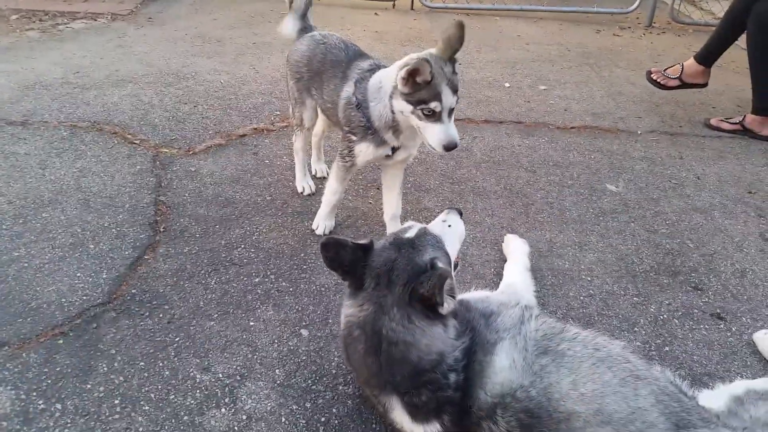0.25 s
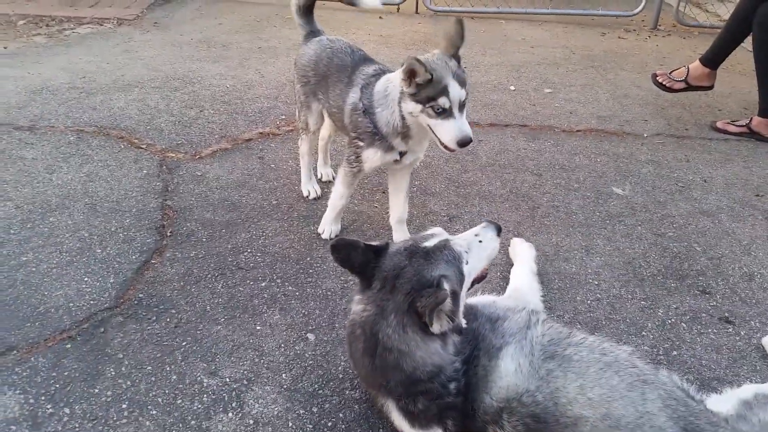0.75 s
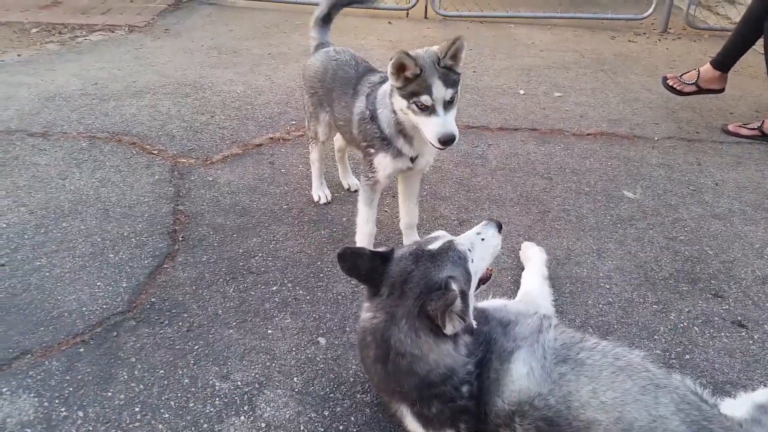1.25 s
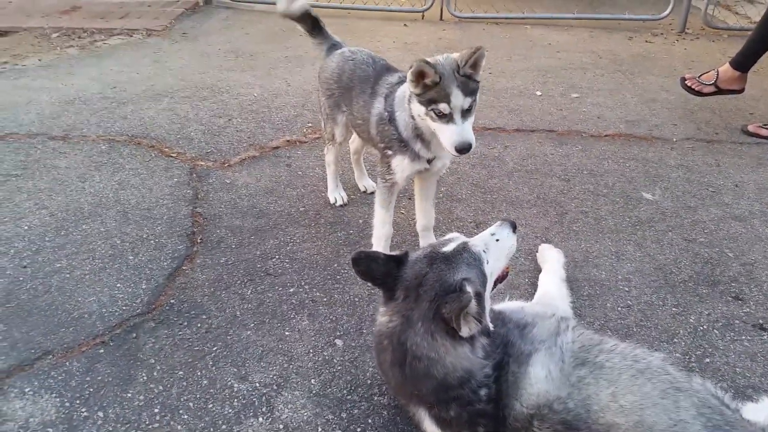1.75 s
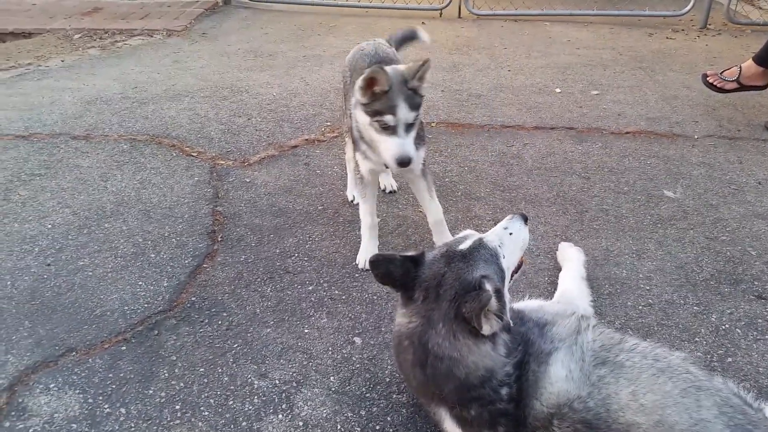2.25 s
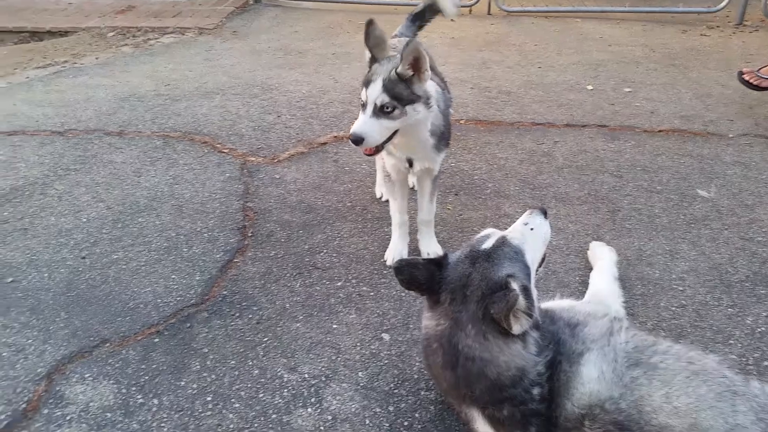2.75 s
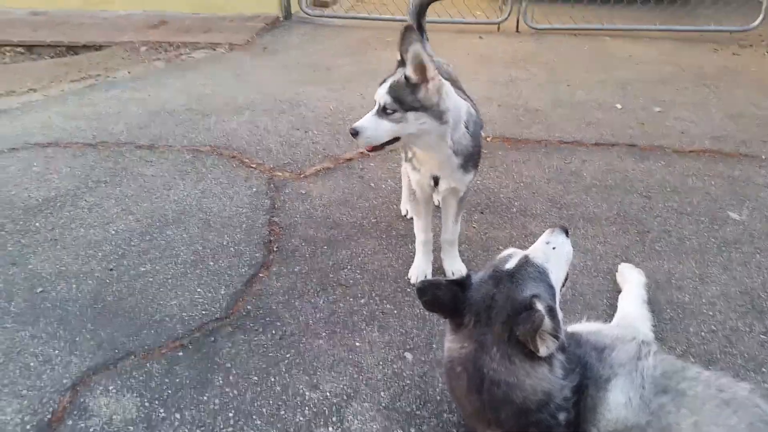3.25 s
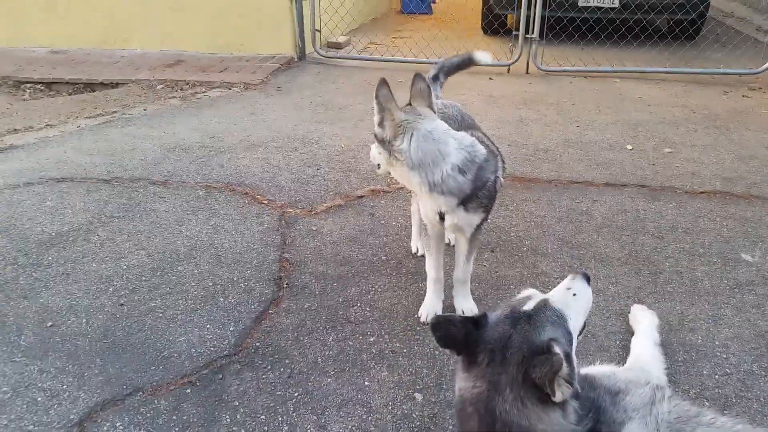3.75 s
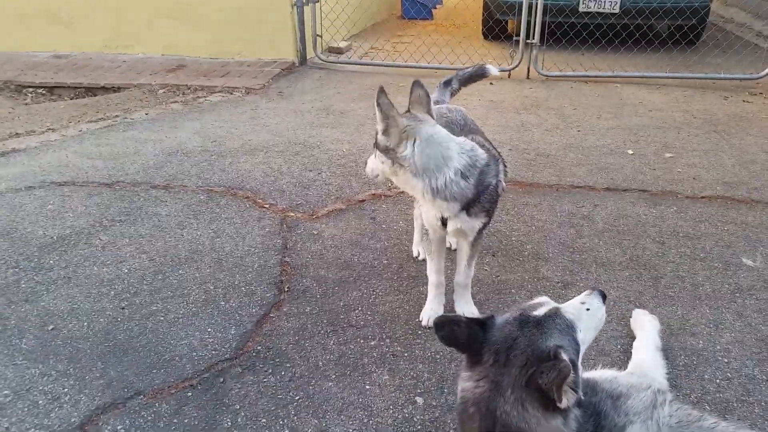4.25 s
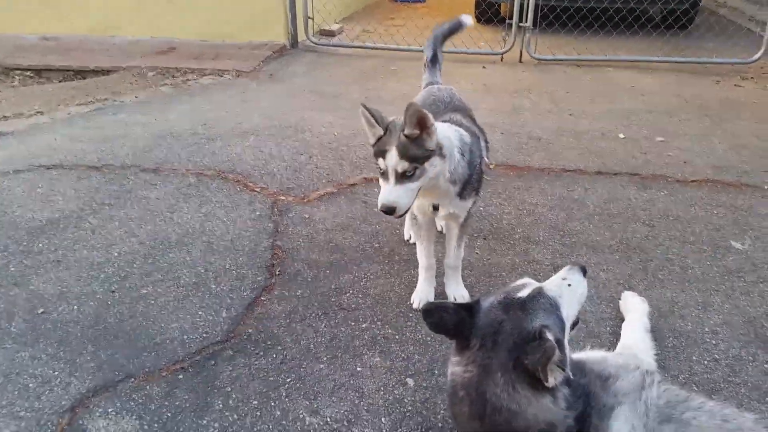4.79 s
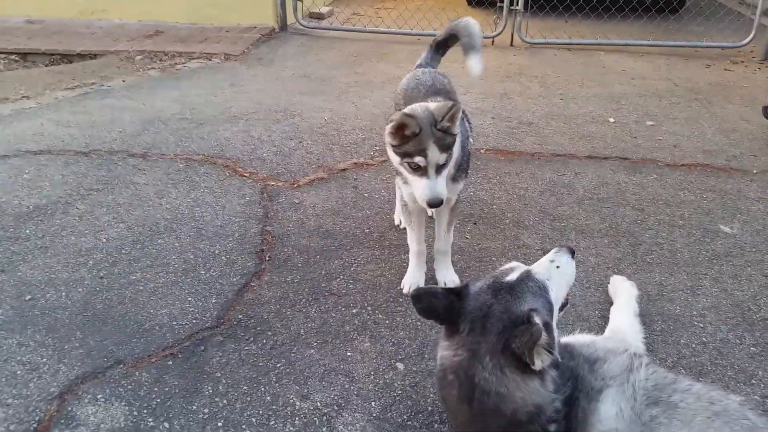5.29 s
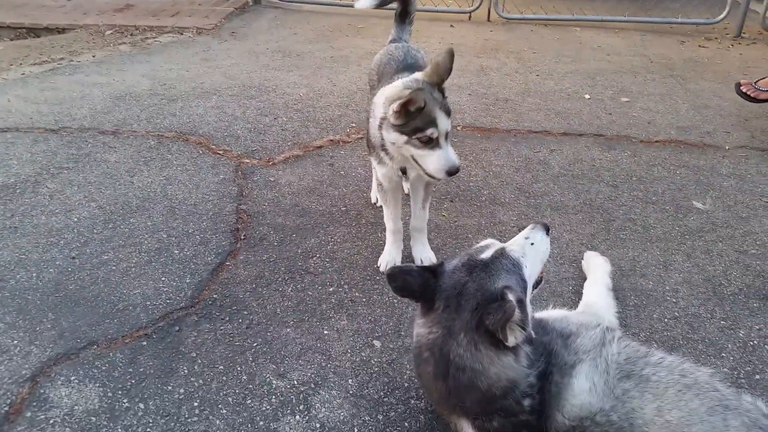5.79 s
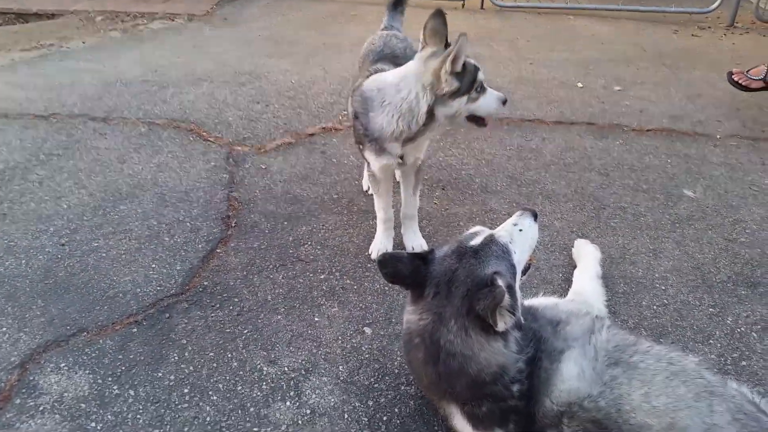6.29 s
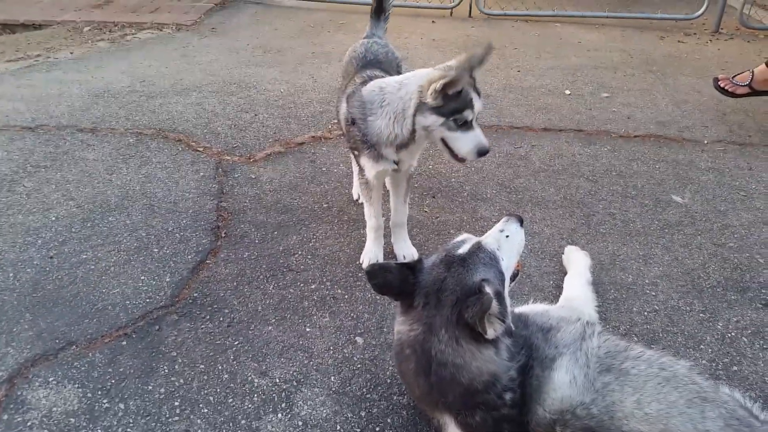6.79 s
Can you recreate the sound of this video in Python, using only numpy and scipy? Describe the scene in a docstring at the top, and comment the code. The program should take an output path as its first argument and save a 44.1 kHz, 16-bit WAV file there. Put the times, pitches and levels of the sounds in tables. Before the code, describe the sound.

A close stereo phone pickup on a paved yard. Throughout, a dull low roar, a wavering hum near 120 Hz and faint hiss, stronger on the left. From 0 to 0.9 seconds, soft brief pants, bright dry collar-tag clinks and claw clicks, the sharpest pair at 0.6, with light fur brushing. At about 1.0 a loud, abrupt, rough-voiced puppy yip lasts under a tenth of a second, ending in a breathy puff and short wall reflection. More tag clinks follow around 1.3. A second, similar yip comes at 1.93, with a tag clink just after. The background is pressed down after the yips and gradually swells back from about three seconds. A very thin, high nose whistle glides near 3.2; claws tick faintly at 3.8 and 6.4. Muffled low hand bumps occur now and then, clustering from 6.2 to 6.8.

```python
"""A puppy yips twice on a paved yard, close to a phone: harmonic voice through three resonances, plus breath.
Nose pants and whistles; collar tag (ringing partials), claws (snaps and ticks), fur (shaped noise).
The hand bumps the phone with decaying low pushes; walls answer by convolution with a noise tail.
Behind: a wavering machine hum, a dull yard roar and hiss, all shaped noise but the hum.
The phone limits the yips, then holds its gain down for about a second."""
import sys
import numpy as np
from scipy import signal
from scipy.fft import rfft, irfft, next_fast_len
from scipy.io import wavfile
from scipy.ndimage import uniform_filter1d, map_coordinates

SR = 44100
rng = np.random.default_rng(int(sys.argv[2]) if len(sys.argv) > 2 else 0)


def wav_out(sig):
    """Save sig, one row per channel (or a flat mono array), as 16-bit PCM at SR to the path in sys.argv[1]."""
    wavfile.write(sys.argv[1], SR, np.round(np.clip(np.atleast_2d(sig).T, -1, 1) * 32767).astype(np.int16))


N = 310023

# Levels are those ahead of the phone's gain control.
# Voice, one track per yip: (time [s], slow fold rate [Hz], level [dB], odd partials [dB],
# mouth resonance [dB], jaw opening [0-1])
YIP_TRACKS = [
    [(.992, 229, -19.5, -8, 1.5, .6), (1.0, 241, 1, -18.5, 7, .95), (1.007, 262.6, 0.5, -15, 9.5, 1),
     (1.013, 291.2, 1, -3.5, -3.5, 0.9), (1.02, 297, -3.5, 9, -13.5, 0.88), (1.03, 315, 5, -2.5, -9.5, 1),
     (1.043, 315, -2, -14, 3, .5), (1.05, 360, 10.5, -14, 0, .35), (1.058, 347, -1.5, -9.5, 6.5, .1),
     (1.066, 333, -2, -2.5, -1.5, .05)],
    [(1.928, 247.2, -12, 2.5, -6, 0.6), (1.935, 256.7, 3, 6, -8, .35), (1.944, 271.5, 13.5, 12, -9.5, .2),
     (1.955, 315, 2.5, 5.5, -11, 1), (1.965, 332, 2.5, -5.5, -1.5, .9), (1.975, 310, 6.5, 3, -12.5, 1),
     (1.99, 312, 0, -28.5, 3, 0.4), (2.004, 315, -4.5, 1, -11, .05)],
]
# Snout colour on the partials: (frequency [Hz], level [dB])
SNOUT_TONE = [(200, 3), (330, -11.5), (500, -1.5), (620, -2), (1000, 0), (1600, 3), (2400, 0), (2850, -14),
              (3300, -12), (4500, -32.5), (7000, -57.5)]
# Breath of each yip: (rasp at mid yip [dB], closing puff [dB])
HUFF_LEVELS = [(-34, -37.5), (-29.5, -37.5)]
# Rasp spectrum: (frequency [Hz], level [dB])
RASP_TONE = [(2500, -26.5), (3300, -2.5), (6600, -16), (7700, 1.5), (9000, -9.5), (10400, -1),
             (13000, -19.5), (16000, -10)]
# Closing puff spectrum: (frequency [Hz], level [dB])
PUFF_TONE = [(2500, -29), (3500, -2.5), (4800, -2.5), (6000, -10), (7500, -11), (16000, -19)]
# Pants: (middle [s], length [s], level [dB])
PANT_STROKES = [(.02, 0.042, -52.5), (.28, 0.33, -52), (.96, .06, -52.5), (1.896, 0.025, -45)]
# Thin nose whistles, one track each: (time [s], frequency [Hz], level [dB])
WHISTLE_TRACKS = [
    [(.2, 12500, -84), (.24, 13000, -74), (.265, 13900, -72), (.29, 13600, -84)],
    [(2.97, 10400, -84), (3.06, 12000, -76), (3.115, 12300, -76), (3.16, 13650, -61), (3.2, 13850, -56),
     (3.235, 13600, -58), (3.265, 12300, -84)],
]
# Touches of the collar tag: (time [s], level [dB])
TAG_TOUCHES = [(0.0244, -58), (0.2916, -35), (0.3525, -29), (0.4135, -34), (0.545, -47), (0.5845, -34.5),
               (0.8345, -40.5), (0.8714, -58), (1.1363, -39.5), (1.3159, -31), (1.3294, -33),
               (1.4875, -42.5), (1.5, -46.5), (1.5614, -56), (1.6247, -56), (1.7684, -46.5), (2.0328, -31),
               (2.2912, -44), (2.9657, -83)]
# Partials of the tag: (frequency [Hz], level [dB], t60 [s])
TAG_MODES = [(11580, 5, 0.029), (11390, -12, 0.086), (14890, -40, .03), (7430, -33, 0.049)]
# Claws on paving: (time [s], level [dB], tick and scrape re snap [dB])
CLAW_TICKS = [(0.1156, -45, -2), (0.1554, -44, -10), (0.2664, -36, -8), (0.4544, -32.5, -9),
              (0.6008, -24.5, 4.5), (0.6161, -24, 4.5), (0.7444, -46, -0.5), (1.3748, -47, 7.5),
              (2.0334, -50, -24), (3.8227, -36.5, -1), (3.8844, -46, -27.5), (4.7531, -58, -10),
              (5.7394, -51, -15), (6.3794, -40, -15)]
# Hand on the case: (time [s], level [dB], push frequency [Hz], knock re push [dB])
CASE_BUMPS = [(0.178, -29, 74.4, -18), (0.551, -31, 124, -3.5), (1.062, -15.5, 132, 1),
              (1.571, -26, 90.4, -11), (1.808, -28, 48.4, -22), (1.879, -30, 129, -7),
              (2.399, -29, 81.1, -12), (3.652, -26, 152, -12), (4.994, -33.5, 185, -16),
              (5.113, -35, 120, -10), (6.231, -22.5, 82, -15), (6.551, -21.5, 88, -11),
              (6.618, -29, 69.5, -10), (6.712, -36.5, 120, 6.5), (6.739, -31, 68, -4),
              (6.786, -26.5, 127, -13)]
# Fur and skin brushing: (start [s], length [s], level [dB])
FUR_STROKES = [(0, 1.4, -72), (0.274, 0.12, -67.5), (0.452, 0.028, -67.5), (.6, .03, -65),
               (.65, .04, -58.5), (3.185, 0.099, -73.5), (3.82, 0.065, -70), (6.728, 0.079, -65)]
# Brushing spectrum: (frequency [Hz], density [dB per Hz])
FUR_TONE = [(3820, -34.5), (6500, -7), (8120, -16), (9550, -0.5), (10400, -1), (15000, 1), (16000, -29.5)]
# Yard roar spectrum: (frequency [Hz], density [dB per Hz])
ROAR_TONE = [(12, -46), (20, -24), (49, -6), (88, -10.5), (124, -3), (254, -12.5), (384, -23), (593, -22.5),
             (706, -16), (787, -28), (1240, -28.5), (1510, -33.5), (1720, -29.5), (2960, -47.5),
             (3600, -49), (4680, -71), (7920, -120)]
# Roar left-right likeness: (frequency [Hz], correlation [0-1])
ROAR_LIKENESS = [(40, .5), (130, 1), (300, 0.76), (640, 0.87), (1400, 0.31), (3000, 0.39)]
# Roar balance: (frequency [Hz], left over right [dB])
ROAR_BALANCE = [(50, 3), (120, -0.5), (380, 0), (700, 3), (1300, 2), (3000, 2.5)]
# Hiss from the left: (frequency [Hz], density [dB per Hz])
HISS_TONE = [(1760, -45), (3000, -36.5), (3600, -9.5), (4680, 6), (6070, -11.5), (6310, -16.5),
             (6800, -34.5), (8840, -70), (15000, -120)]
# Faint top hiss: (frequency [Hz], density [dB per Hz])
AIR_TONE = [(3820, -37.5), (6500, -11.5), (6880, -13.5), (8340, -16), (10200, -5), (14300, 2.5),
            (16000, -4)]
# Wall echoes: (delay [s], spread [s], level [dB])
WALL_ECHOES = [(0.112, .018, -22), (.19, 0.054, -30)]
# Decay of the yard's tail: (frequency [Hz], t60 [s])
YARD_T60 = [(300, .35), (650, 0.23), (1500, .3), (3000, .25), (10000, 0.05)]
# Colour of the returning sound: (frequency [Hz], level [dB])
ECHO_TONE = [(250, -4.5), (640, -12), (1000, -17), (1500, -20), (2500, -12.5), (3300, -3), (8000, -16)]
# Spectra of pants and claw scrape: (frequency [Hz], level [dB])
PANT_TONE = [(700, -27.0), (1300, -15), (1700, -13), (2200, -17), (3200, -29), (5000, -89.0)]
SCRAPE_TONE = [(500, -28.0), (950, 2.5), (1800, -17), (3600, -12.5), (6000, -19), (9000, -83)]
# Breath left-right likeness: (frequency [Hz], correlation [0-1])
BREATH_LIKENESS = [(3000, .8), (9000, .2)]
# Voice balance: (frequency [Hz], left over right [dB])
VOICE_BALANCE = [(400, 0), (700, 3), (1300, -.5), (2400, 0), (8000, -1)]

THROAT_START_HZ, THROAT_END_HZ, MOUTH_HZ = 811, 638, 1574
MUZZLE_START_HZ, MUZZLE_END_HZ, MUZZLE_SHUT_DB = 2560, 2150, -27.5
SINK_SHARE = .5  # share of the yip over which throat and muzzle sink
# rises and falls are times for 60 dB
RASP_RISE_S, RASP_GROWS_DB, RASP_FALL_S = .012, 8, .05
PUFF_LATE_S, PUFF_HOLD_S, PUFF_RISE_S, PUFF_FALL_S = .012, .018, .12, .04  # late: after the voice track ends
STROKE_RISE_S, STROKE_FALL_S = .08, 0.33
SELF_NOISE_DB, TOP_HZ = -95.5, 15900  # the phone's own hiss and cutoff


def amp(db):
    """Amplitude of a level in dB."""
    return 10 ** (np.asarray(db) / 20)


def unit(x):
    """x scaled to rms 1."""
    return x / np.sqrt(np.mean(x ** 2) + 1e-20)


def along(points, hz):
    """(frequency [Hz], value) points read on a log axis."""
    f, v = np.transpose(points)
    return np.interp(np.log(hz + 1), np.log(f + 1), v)


def curves(rows):
    """Sample indices over the rows' time, and each column interpolated there."""
    s, *cols = np.transpose(rows)
    at = np.arange(round(s[0] * SR), min(N, round(s[-1] * SR)))
    return at, [np.interp(at / SR, s, c) for c in cols]


def wobble(rate_hz):
    """Smooth random curve with rate_hz knots a second."""
    knots = rng.standard_normal(int(N * rate_hz / SR) + 4)
    return map_coordinates(knots, [np.arange(N) * rate_hz / SR])


def filtered(x, response):
    """x times a response of frequency."""
    m = next_fast_len(N + SR // 2)
    return irfft(rfft(x, m) * response(np.fft.rfftfreq(m, 1 / SR)), m)[..., :N]


def tilted(x, balance):
    """x split or tilted between left and right by a balance curve."""
    return filtered(x, lambda hz: amp(np.outer([.5, -.5], along(balance, hz))))


def noise(spectrum, alike, left=((1, 0),)):
    """Stereo noise of rms 1 with a spectrum, a left-right likeness and a balance."""
    def mid_side(hz):
        turn = np.arccos(np.clip(along(alike, hz), -1, 1)) / 2
        return amp(along(spectrum, hz)) * np.array([np.cos(turn), np.sin(turn)])

    mid, side = filtered(rng.standard_normal((2, N)), mid_side)
    return unit(tilted(np.array([mid + side, mid - side]), left))


def swell(start_s, stop_s, rise_s, fall_s):
    """Gain that rises 60 dB to 1 at start_s, holds, and falls 60 dB after stop_s."""
    t = np.arange(N) / SR
    return amp(-60 * (np.maximum(start_s - t, 0) / rise_s + np.maximum(t - stop_s, 0) / fall_s))


def yips():
    """Folds close strong-weak in turn, so odd partials of the slow rate come and go; two of three resonances sink."""
    out, order = np.zeros(N), np.arange(1, 16)[:, None]
    jitter, shimmer = wobble(300), np.array([wobble(220) for _ in order])
    for rows in YIP_TRACKS:
        s, rate_hz, level_db, odd_db, mouth_db, jaw = np.transpose(rows)
        at, (db,) = curves([(s[0] - .006, -80), *zip(s, level_db), (s[-1] + .01, -80)])
        rate_hz, odd_db, mouth_db, jaw = [np.interp(at / SR, s, c) for c in (rate_hz, odd_db, mouth_db, jaw)]

        sunk = np.interp(at / SR, [s[1], s[1] + SINK_SHARE * (s[-1] - s[1])], [0, 1])
        throat_hz = THROAT_START_HZ + sunk * (THROAT_END_HZ - THROAT_START_HZ)
        muzzle_hz = MUZZLE_START_HZ + sunk * (MUZZLE_END_HZ - MUZZLE_START_HZ)
        muzzle_db = (1 - jaw) * MUZZLE_SHUT_DB  # louder as the jaw opens

        turn = 2 * np.pi * np.cumsum(rate_hz * (1 + .016 * jitter[at])) / SR
        hz = order * rate_hz
        resonances = [(throat_hz, 190), (MOUTH_HZ, 250), (muzzle_hz, 220)]  # (centre [Hz], half width [Hz])
        peaks = np.array([width / (width + 1j * (hz - centre)) for centre, width in resonances])
        lag = 1.8 * np.angle(peaks).sum(axis=0) - 0.14 * order ** 2  # resonances delay the partials above them

        peak_gain = amp([0 * jaw, mouth_db, muzzle_db])[:, None]
        size = (np.abs(peaks) ** 2 * peak_gain).sum(axis=0)
        size *= amp(along(SNOUT_TONE, hz) + order % 2 * odd_db)
        power = (size ** 2).sum(axis=0) / 2
        size *= amp(3 * np.minimum(order / 6, 1) * shimmer[:, at]) / np.sqrt(power)
        out[at] += amp(db) * (size * np.cos(order * turn + lag)).sum(axis=0)
    return out


def huffs():
    """Air rasps in patches through the yip and puffs out as the jaws close."""
    out, t = np.zeros((2, N)), np.arange(N) / SR
    rasp = noise(RASP_TONE, BREATH_LIKENESS) * amp(3 * wobble(90))
    puff = noise(PUFF_TONE, BREATH_LIKENESS)
    for rows, (rasp_db, puff_db) in zip(YIP_TRACKS, HUFF_LEVELS):
        start_s, stop_s = rows[1][0], rows[-1][0]
        grown_db = rasp_db + RASP_GROWS_DB * np.interp(t, [start_s, stop_s], [-.5, .5])
        out += amp(grown_db) * swell(start_s, stop_s, RASP_RISE_S, RASP_FALL_S) * rasp
        top_s = stop_s + PUFF_LATE_S
        out += amp(puff_db) * swell(top_s, top_s + PUFF_HOLD_S, PUFF_RISE_S, PUFF_FALL_S) * puff
    return out


def nose():
    """Soft noise pants through the open mouth, and thin gliding sine whistles."""
    t = np.arange(N) / SR
    flow = sum(amp(db) * np.exp(-((t - s) / length_s * 2) ** 4) for s, length_s, db in PANT_STROKES)
    out = flow * noise(PANT_TONE, [(1, 0.97)])[0]
    for rows in WHISTLE_TRACKS:
        at, (hz, db) = curves(rows)
        smooth_hz = uniform_filter1d(hz, 600)
        out[at] += amp(db) * np.sin(2 * np.pi * np.cumsum(smooth_hz) / SR)
    return out


def collar():
    """Each touch rings the metal tag at new strengths; it swings, so the ports hear it in changing phase."""
    out, t = np.zeros((2, N + SR)), np.arange(SR // 4) / SR
    for s, db in TAG_TOUCHES:
        apart_rad = rng.normal(-.1, .2) * np.array([[-1], [1]])
        ring = 0
        for hz, mode_db, t60_s in TAG_MODES:
            decay = amp(mode_db + rng.normal(0, 1.5) - 60 * t / t60_s)
            ring = ring + decay * np.sin(2 * np.pi * hz * t + apart_rad)
        crack = .25 * amp(-60 * t / 0.005) * np.diff(rng.standard_normal((2, len(t) + 1)))
        attack = 1 - np.exp(-t / .0012)
        out[:, round(s * SR):][:, :len(t)] += amp(db) * (ring + crack) * attack
    return out[:, :N]


def claws():
    """A bright snap, a short hollow tick and a little scraping on the paving."""
    out, t = np.zeros(N + SR), np.arange(SR // 20) / SR
    scrape = noise(SCRAPE_TONE, [(1, 1.0)])[0]
    attack = 1 - np.exp(-t / 0.00024)
    for s, db, low_db in CLAW_TICKS:
        snap = .28 * amp(-60 * t / .003) * np.diff(rng.standard_normal(len(t) + 1))
        tick = amp(-60 * t / .006) * (np.sin(2 * np.pi * 3500 * t) + .6 * np.sin(2 * np.pi * 4700 * t))
        drag = amp(-25 - 60 * t / .06) * scrape[round(s * SR):][:len(t)]
        out[round(s * SR):][:len(t)] += amp(db) * attack * (snap + amp(low_db) * (tick + drag))
    return out[:N]


def bumps():
    """A low push that dies in a few cycles, led by a short knock; each port feels it differently."""
    out, t = np.zeros((2, N + SR)), np.arange(SR // 8) / SR
    thud = np.sin(2 * np.pi * 500 * t) + .7 * np.sin(2 * np.pi * 1150 * t)
    thud *= np.exp(-t / .0015) * (1 - np.exp(-t / .0002))
    for s, db, hz, knock_db in CASE_BUMPS:
        push = np.sin(2 * np.pi * hz * t + np.array([[-.5], [.5]]))
        push *= np.exp(-(t * hz / 1.6) ** 3) * (1 - np.exp(-t / 0.00135))
        port_db = db + np.array([[1.5], [-1.5]])
        out[:, round(s * SR):][:, :len(t)] += amp(port_db) * (amp(knock_db) * thud - push / push.max())
    return out[:, :N]


def fur():
    """Strokes of bright noise with an uneven, flickering grip."""
    strokes = sum(amp(db) * swell(s, s + length_s, STROKE_RISE_S, STROKE_FALL_S)
                  for s, length_s, db in FUR_STROKES)
    return strokes * amp(2 * wobble(40) + 2.8 * wobble(220)) * noise(FUR_TONE, [(1, 0.72)])


def walls(x):
    """A diffuse tail, dying fastest in the top treble, lumped where rough walls answer."""
    hz, t, z = signal.stft(rng.standard_normal((2, SR // 2)), SR, nperseg=256)
    tail = signal.istft(z * amp(-60 * t / along(YARD_T60, hz)[:, None]), SR, nperseg=256)[1]
    tail = amp(-5.5) * tail / np.linalg.norm(tail[0])
    t = np.arange(tail.shape[1]) / SR
    for delay_s, spread_s, db in WALL_ECHOES:
        lump = np.exp(-((t - delay_s) / spread_s) ** 2) * rng.standard_normal(tail.shape)
        tail += amp(db) * lump / np.linalg.norm(lump[0])
    back = filtered(x, lambda hz: amp(along(ECHO_TONE, hz)))
    return signal.fftconvolve(back[None], tail, axes=1)[:, :N]


def machine():
    """Sine hum near 120 Hz, wavering in pitch and level."""
    hz = 120.5 + 2.9 * wobble(15)
    port_rad = np.array([[.3], [-.3]])
    return amp(-41 + 1.5 * wobble(7.0)) * np.sin(2 * np.pi * np.cumsum(hz) / SR + port_rad)


def yard():
    """Slowly wavering roar, a hiss from the left and a faint top hiss, as shaped noise."""
    roar = amp(-40.5 + .8 * wobble(1.0)) * noise(ROAR_TONE, ROAR_LIKENESS, ROAR_BALANCE)
    hiss = amp(-58.5) * noise(HISS_TONE, [(1, .1)], [(1, 29)])
    air = amp(-73.5) * noise(AIR_TONE, [(1, 0.008)])
    return roar + hiss + air


def scene():
    """All sources at the phone's two ports, with the walls' answer."""
    voice = yips() + huffs() + nose()
    ports = filtered(tilted(voice, VOICE_BALANCE), lambda hz: np.exp([[.35j], [-.35j]]))  # phase apart
    small = collar() * amp([[-1.5], [1.5]]) + claws() * amp([[.8], [-.8]])
    small[0] = np.roll(small[0], 1)  # one sample later at the left port
    echoes = walls((voice + small).mean(axis=0))
    return ports + echoes + small + bumps() + fur() + machine() + yard()


def record(dry):
    """Slow gain control sinks after a loud sound, holds, recovers; fast compressor and soft clipping follow."""
    def level_db(x):
        power = uniform_filter1d(np.mean(x ** 2, axis=0), 300, origin=100)
        return 10 * np.log10(np.abs(power) + 1e-12)

    step, hold_steps = 441, round(.9 * SR / 441)  # 10 ms steps, 0.9 s hold
    loud = level_db(dry)[::step] > -20
    held = np.convolve(loud, np.ones(hold_steps))[:len(loud)] > 0
    sunk = [0]
    for down in held:
        sunk.append(sunk[-1] + (down - sunk[-1]) * (.021 if down else .045))
    sunk = np.interp(np.arange(N), np.arange(len(sunk)) * step, sunk)

    low = filtered(dry, lambda hz: 1 / (1 + (hz / 900) ** 2))
    slow = low * amp(-9 * sunk) + (dry - low) * amp(-16 * sunk)  # the bass sinks less than the treble
    fast_db = uniform_filter1d(-.4 * np.maximum(level_db(slow) + 30, 0), 300)
    limited = amp(fast_db) * slow
    limited /= (1 + np.abs(limited / .98) ** 12) ** (1 / 12)
    limited += amp(SELF_NOISE_DB) * rng.standard_normal(dry.shape)
    return filtered(limited, lambda hz: hz < TOP_HZ)


dry = scene()
out = record(dry)
wav_out(out)
```